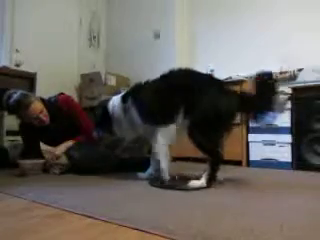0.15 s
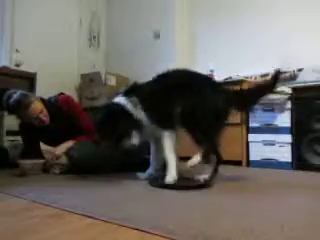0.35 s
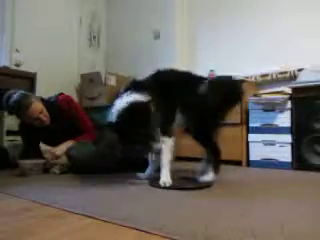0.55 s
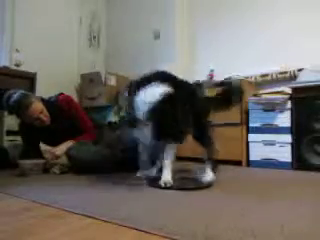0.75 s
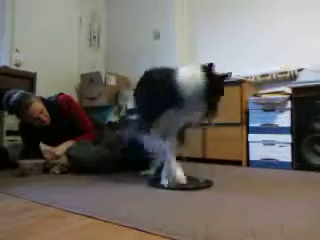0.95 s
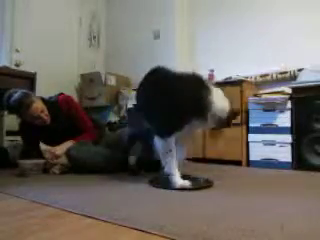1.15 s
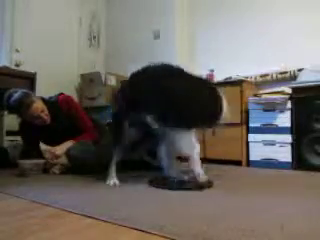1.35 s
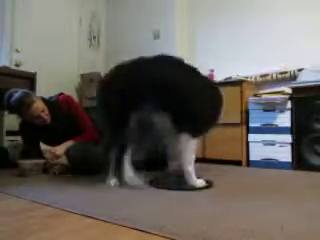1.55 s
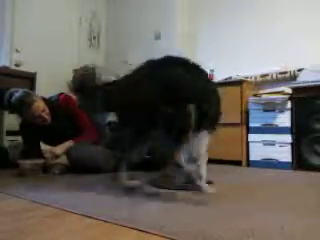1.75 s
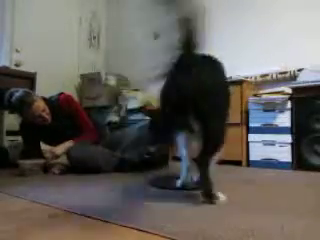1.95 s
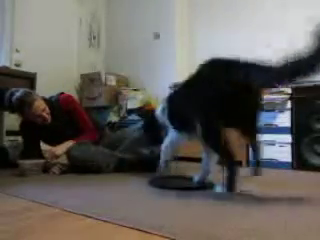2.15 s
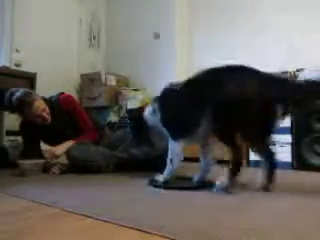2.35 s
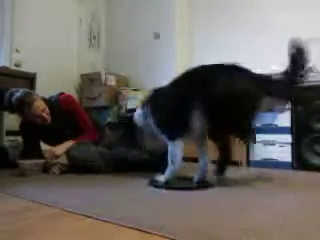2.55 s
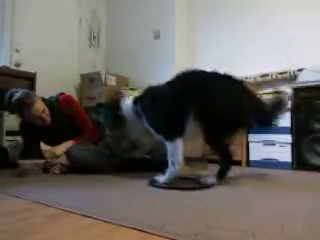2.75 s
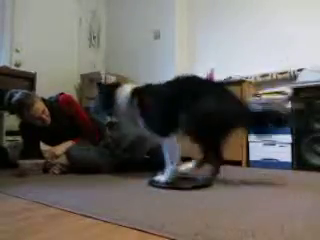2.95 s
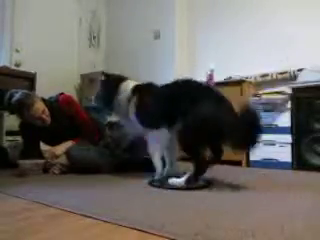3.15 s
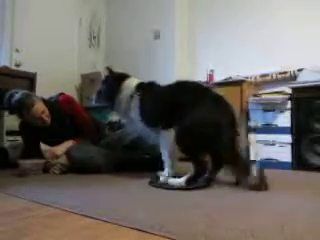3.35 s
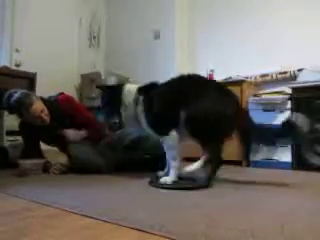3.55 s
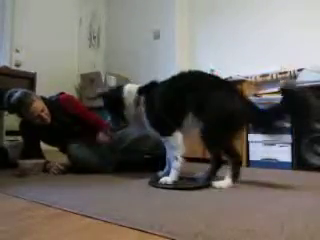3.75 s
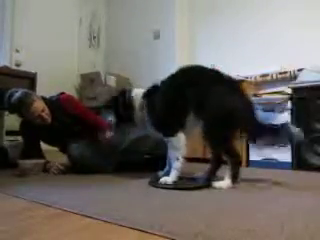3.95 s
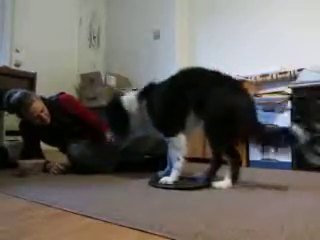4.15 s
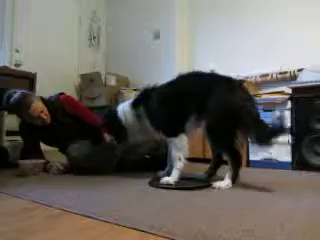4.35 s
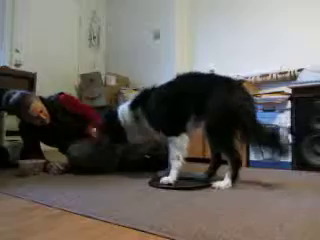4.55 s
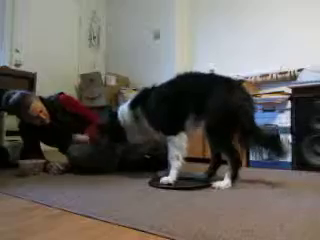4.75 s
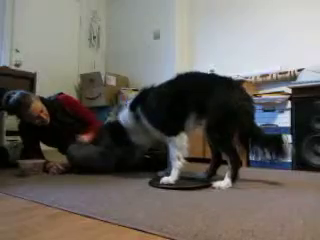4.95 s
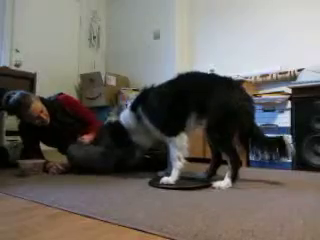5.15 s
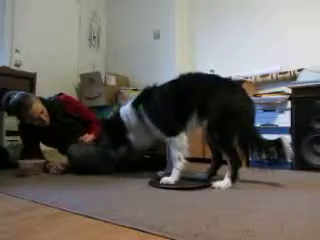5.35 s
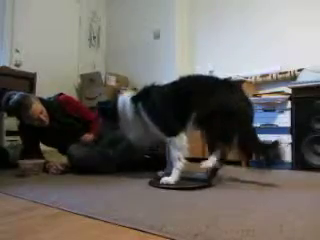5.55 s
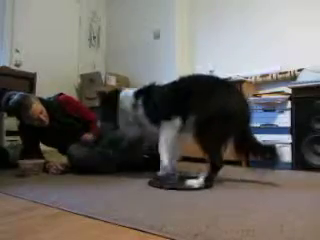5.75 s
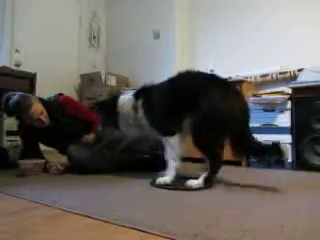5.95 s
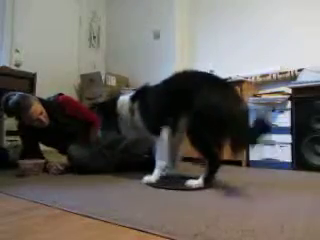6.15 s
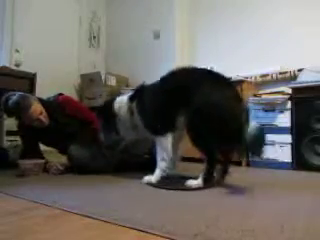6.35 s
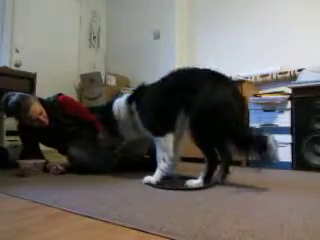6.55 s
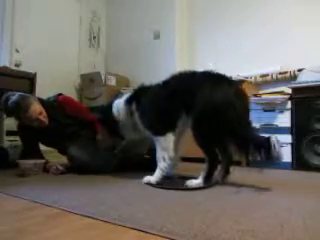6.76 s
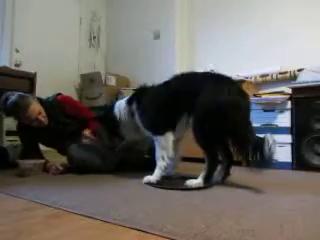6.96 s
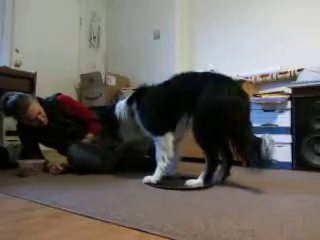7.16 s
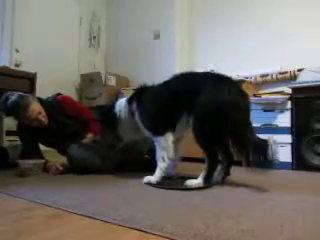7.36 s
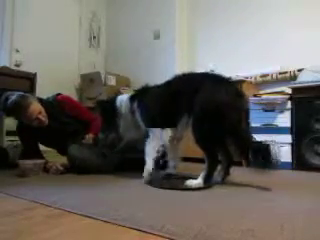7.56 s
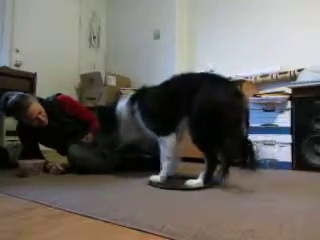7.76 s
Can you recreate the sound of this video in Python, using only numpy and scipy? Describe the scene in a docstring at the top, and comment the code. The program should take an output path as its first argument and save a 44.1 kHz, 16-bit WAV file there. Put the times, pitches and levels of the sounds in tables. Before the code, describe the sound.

Irregular claw clacks and paw thumps on a metal tray, two double clicks from a clicker, and faint rustling in a humming room.

```python
"""A dog's claws tap and skid on a metal tray as it pivots, and its soft paws thud.
The tray lies on the carpet of a small furnished room, so its ringing dies quickly.
A training clicker is pressed and let go twice, its steel leaf snapping each way.
Fur and sleeves rustle between the steps, over a low ventilation hum."""
import sys
import numpy as np
from scipy import signal
from scipy.fft import rfft, irfft
from scipy.io import wavfile
from scipy.ndimage import uniform_filter1d

SR = 44100
rng = np.random.default_rng(int(sys.argv[2]) if len(sys.argv) > 2 else 0)


def to_wav(sig):
    """Store sig (one row per channel, or 1-D mono) as 16-bit WAV at the path in sys.argv[1].

    Samples outside -1..1 are clipped; the rate is SR.
    """
    pcm = np.clip(np.atleast_2d(sig), -1, 1) * 32767
    pcm = np.round(pcm).astype(np.int16)
    wavfile.write(sys.argv[1], SR, pcm.T)  # frames by channels


N = 344862


def undb(db):
    """Turn decibels into a volume multiplier."""
    return 10 ** (np.asarray(db) / 20)

def level(x, db):
    """Set a sound's average (rms) level."""
    return x * undb(db) / np.sqrt(np.mean(x ** 2) + 1e-20)

def unit(x):
    """Scale a sound to a total energy of one."""
    return x / np.sqrt(np.sum(x ** 2) + 1e-20)

def hit_level(x, db):
    """Set a short sound's level, averaged over 50 ms."""
    return unit(x) * undb(db) * np.sqrt(SR / 20)

def clock(seconds):
    """The time of each sample."""
    return np.arange(int(seconds * SR)) / SR

def add(track, start_s, x):
    """Mix a sound into the track."""
    i = max(0, int(start_s * SR))
    track[..., i:i + x.shape[-1]] += x[..., :max(0, N - i)]

def band(x, low_hz, high_hz):
    """Keep the pitches between two limits."""
    return signal.sosfilt(signal.butter(2, [low_hz, high_hz], "band", fs=SR, output="sos"), x)

def along(points, hz):
    """Read between the rows of a (pitch_hz, value) table."""
    pitches, values = np.transpose(points)
    return np.interp(np.log(hz + 1), np.log(pitches), values)

def colour(x, points, size=4096):
    """Shape a sound's tone with a (pitch_hz, gain_db) table."""
    gain = undb(along(points, np.fft.rfftfreq(size, 1 / SR)))
    cepstrum = irfft(np.log(gain))
    cepstrum[1:size // 2] *= 2  # folded so that the filter never rings ahead of a hit
    cepstrum[size // 2 + 1:] = 0
    return signal.fftconvolve(x, irfft(np.exp(rfft(cepstrum))))[:len(x)]

def fade(t, fade_s):
    """Die away by 60 dB in fade_s."""
    return np.exp(-np.log(1000) * t / fade_s)

def wander(per_s):
    """A slow random drift, about 1 in size."""
    hold = int(SR / per_s)
    steps = np.repeat(rng.standard_normal(N // hold + 1), hold)
    return level(uniform_filter1d(steps, hold)[:N], 0)

def ring(tones, t):
    """Struck metal rings with several tones, each fading at its own speed."""
    return unit(sum(undb(db) * fade(t, fade_s) * np.sin(2 * np.pi * (hz * t + rng.random()))
                    for hz, db, fade_s in tones))

def crack(n, spread_s):
    """A sharp hit travels through thin metal: high pitches arrive before low ones."""
    hz = np.fft.rfftfreq(n, 1 / SR)
    delay_s = spread_s / np.sqrt(1 + hz / 1000)
    return irfft(np.exp(-2j * np.pi * np.cumsum(delay_s) * SR / n), n)

def catches(n, per_s, spread_db):
    """Tiny random ticks of uneven size, as when rubbing surfaces stick and slip."""
    ticks = (rng.random(n) < per_s / SR) * rng.choice([-1, 1], n)
    return ticks * undb(spread_db * rng.standard_normal(n))

# How alike the room sounds on the left and right: pitch_hz, likeness (0 to 1)
STEREO_LIKENESS = [(40, 0), (120, 0.76), (300, 0.32), (1200, 0.26), (3000, 0.21), (8000, 0)]
def room_noise(n):
    """Noise from all around at two close microphones: alike in the bass, unrelated in the treble."""
    alike = np.clip(along(STEREO_LIKENESS, np.fft.rfftfreq(n, 1 / SR)), 0, 1)
    mid, side = irfft(rfft(rng.standard_normal((2, n))) * np.sqrt([1 + alike, 1 - alike]), n)
    return np.array([mid + side, mid - side])

def room(x, direct_db, echo_db, hits=(1.0,), size=16384):
    """Play x once per hit, with room echoes that die quickly at first, then linger faintly."""
    t, hits = np.arange(size) / SR, unit(np.asarray(hits))
    decay = fade(t, fade_s=0.2) ** 2 + (undb(-12) * fade(t, fade_s=0.49)) ** 2
    energy = np.abs(signal.fftconvolve(decay, hits ** 2)[:size])
    # every spot in the room has its own pattern of echoes
    response = undb(echo_db) * np.sqrt(2) * unit(room_noise(size) * np.sqrt(energy))
    response[:, :len(hits)] += undb(direct_db) * hits
    return signal.fftconvolve(x[None], response, axes=1)

# Tone of the rushing air: pitch_hz, gain_db
AIR_TONE = [(15, -56), (25, -31.5), (39, -30), (92, -4), (137, -6), (223, -4), (263, -15), (344, -14),
            (439, -22), (476, -19), (796, -23.5), (1330, -26), (4030, -38), (6050, -38.5), (16000, -61.5)]
# Low notes at which the room booms: pitch_hz, width_hz, level_db
ROOM_BOOMS = [(61.3, 17, -61), (172.9, 11.5, -53.5), (227.3, 12, -50.5)]
# Notes of the hum: pitch_hz, relative_level_db
HUM_NOTES = [(107.7, -58.5), (215.3, -55), (236.9, -59.5)]
def ventilation():
    """Air rushes steadily and keeps the room booming, along with a wavering hum."""
    t = np.arange(N) / SR
    rush = level(np.array([colour(side, AIR_TONE) for side in room_noise(N)]), db=-43)
    noise = room_noise(N)
    boom = sum(level(band(noise, hz - width / 2, hz + width / 2), db) for hz, width, db in ROOM_BOOMS)
    hum = sum(undb(db + 2) * np.sqrt(2) * np.sin(2 * np.pi * hz * t + 0.96 * wander(per_s=4.6))
              for hz, db in HUM_NOTES)
    return rush + boom + hum

# Tone of fur and sleeves: pitch_hz, gain_db
RUSTLE_TONE = [(240, -45.5), (400, 7.5), (542, -11.5), (602, 4.5), (723, -0.5), (2960, -4), (4070, -10.5),
               (6130, -7), (15000, -33.5)]
# Brushing strokes: start_s, length_s, level_db
RUSTLE_STROKES = [(2.539, 0.19, -48.5), (2.846, .13, -60.5), (4.193, 0.27, -56), (4.452, 0.21, -49),
                  (4.747, 0.21, -49.5), (6.648, 0.31, -65), (6.9, 0.05, -56), (7.14, 0.16, -60),
                  (7.427, 0.19, -57.5), (7.742, .07, -49.5)]
def rustle(rise_s=0.051, fall_s=0.05):
    """Fur and cloth brush in soft, grainy strokes: each swells, holds and dies away."""
    strokes, t = np.zeros(N), np.arange(N) / SR
    for start_s, length_s, db in RUSTLE_STROKES:
        swell = np.clip((t - start_s) / rise_s, 0, 1)
        tail = np.exp(-np.maximum(t - start_s - length_s, 0) / fall_s)
        strokes += undb(db) * swell * tail
    flicker = undb(0.5 * wander(per_s=27))
    grain = colour(catches(N, per_s=4000, spread_db=10.56), RUSTLE_TONE)
    return strokes * flicker * level(grain, 0)

# Clicker pressed, and let go: start_s, level_db
CLICKER_PRESSES = [(3.415, -25), (6.031, -25)]
CLICKER_RELEASES = [(3.5402, -25.5), (6.1426, -24)]
# Ringing of its steel leaf in each position: pitch_hz, level_db, fade_s
PRESSED_RING = [(2630, -24, 0.034), (3180, -15, 0.0035), (4930, -17, 0.024), (5600, -1, 0.0036),
                (6750, -11, 0.029), (7000, -2.5, 0.0045)]
RELEASED_RING = [(2670, 12, 0.0027), (3400, -34, 0.02), (4175, 13.5, 0.013), (4320, -19.5, 0.028),
                 (4510, 13, 0.0051), (5900, -22.5, 0.017), (8560, -12, 0.017)]
# Tone of the snap: pitch_hz, gain_db
SNAP_TONE = [(410, -55), (700, -16), (1180, -16), (1840, -9.5), (2400, -1.5), (3030, -3), (4260, -3.5),
             (5260, 2), (6920, -0.5), (16000, -27)]
# A hand shields the clicker, so echoes off floor, walls and ceiling carry it: delay_s, gain_db
SNAP_PATHS = [(0, 7), (.0018, 11), (.0081, 12), (.0097, 9), (.0205, 2), (0.031, -2)]
def clicker():
    """A steel leaf buckles with a snap and springs back about an eighth of a second later."""
    out, t = np.zeros((2, N)), clock(.06)
    snap = unit(colour(crack(len(t), spread_s=.001), SNAP_TONE))
    paths = np.zeros(len(t))
    for delay_s, db in SNAP_PATHS:
        paths[int(delay_s * SR)] = undb(db)
    for clicks, tones in ((CLICKER_PRESSES, PRESSED_RING), (CLICKER_RELEASES, RELEASED_RING)):
        for start_s, db in clicks:
            click = hit_level(band(ring(tones, t), 1930, 14000) + undb(-2) * snap, db)
            add(out, start_s, room(click, direct_db=-1.5, echo_db=-1, hits=paths))
    return out

# Tone of the scuffs and hisses: pitch_hz, gain_db
SWELL_TONE = [(290, -48), (500, -30), (570, -18), (1090, -27), (1570, -9.5), (2930, -6.5), (3440, -7.5),
              (8830, -12.5), (14500, -33), (16000, -25)]
# Scuffs, paw drags and, at 0.827 and 1.065 s, faint hisses: loudest_at_s, rise_s, fall_s, level_db
SWELLS = [(0.322, 0.081, 0.042, -44), (0.827, 0.011, 0.004, -39), (1.065, 0.025, 0.0059, -40.5),
          (1.765, .02, .008, -57.5), (1.985, .015, 0.011, -45), (5.746, 0.028, 0.014, -22)]
def scuffs_and_hisses():
    """Tiny ticks swell and fade: a paw scuffing the tray, or a faint hiss just before a tap."""
    out, t = np.zeros(N), np.arange(N) / SR
    grain = level(colour(catches(N, per_s=5000, spread_db=8.9), SWELL_TONE), 0)
    for loudest_at_s, rise_s, fall_s, db in SWELLS:
        width_s = np.where(t < loudest_at_s, rise_s, fall_s)
        out += grain * undb(db) / np.cosh((t - loudest_at_s) / width_s) ** 2.3
    return out

# Soft paw pads landing: start_s, relative_level_db, pitch_hz
PAW_LANDINGS = [(0.036, -16.5, 613), (0.472, -19, 276), (0.586, -16, 298), (1.054, -20, 370),
                (1.28, -19.5, 336), (1.393, -29.5, 593), (1.663, -29.5, 217), (2.012, -17, 378),
                (2.19, -27, 220), (2.302, -18.5, 373), (2.664, -22, 294), (2.902, -28.5, 325),
                (3.145, -22.5, 217), (3.153, -26, 660), (3.347, -26.5, 320), (3.782, -18.5, 276),
                (5.679, -30, 372), (5.785, -21, 215), (6.228, -24.5, 234), (6.248, -22.5, 218),
                (6.359, -29, 345), (6.383, -26.5, 330)]
def paw_thuds():
    """A soft pad pushes the tray into the carpet: a dull knock with a little patter above it."""
    out, t = np.zeros((2, N)), clock(.12)
    for start_s, db, hz in PAW_LANDINGS:
        knock = unit(np.sin(2 * np.pi * hz * t) * fade(t, 0.032) * (1 - np.exp(-t / 0.0015)))
        puff = rng.standard_normal(len(t)) * fade(t, 0.089) * (1 - np.exp(-t / 0.00075))
        patter = unit(band(puff, 0.91 * hz, 3 * hz))
        thud = hit_level(knock + undb(-4.5) * patter, db - 13)
        add(out, start_s, room(thud, direct_db=-3, echo_db=-2.5))
    return out

def touch(x, weight_db, sharp_db, spot_hz):
    """A heavy hit adds bass, a sharp one adds treble, and the spot it lands on favours one pitch."""
    bass_below_hz, treble_above_hz = 810, 5060
    spot_db, spot_octaves = 4.5, 0.2
    hz = np.geomspace(50, SR / 2, 120)
    bass = weight_db / (1 + (hz / bass_below_hz) ** 2)
    treble = sharp_db / (1 + (treble_above_hz / hz) ** 2)
    spot = spot_db * np.exp(-(np.log2(hz / spot_hz) / spot_octaves) ** 2)
    return colour(x, np.transpose([hz, bass + treble + spot]))

# Tone of the tray's short clack: pitch_hz, gain_db
CLACK_TONE = [(140, -27.5), (230, -2), (378, 0), (452, -9.5), (783, -4.5), (1060, -4.5), (2230, -1),
              (2530, -3.5), (2910, -1), (4010, -7.5), (5420, -6), (6700, -8.5), (12300, -24),
              (14100, -25.5), (16000, -31)]
# Ringing of the tray: pitch_hz, level_db, fade_s
TRAY_RING = [(393.4, -9.5, 0.33), (582, 7, 0.1), (900, -2, 0.24), (1590, -6, 0.23), (2173, 4, 0.21),
             (2140, 5.5, 0.072), (2290, 15, 0.049), (2710, 0, 0.041), (2910, 1, 0.22), (2718, 7, 0.047),
             (3531, -2, 0.2), (4420, -8.5, 0.3), (4570, 15, 0.028), (4900, -11, 0.34), (5380, -3, 0.21),
             (5900, -2, 0.034), (6540, -14, 0.04), (6737, -18, 0.073), (6640, -16, 0.033),
             (7590, -14, 0.033)]
# Taps on the tray: start_s, skid_s, relative_level_db, weight_db, sharp_db, spot_hz
# They are claws, except at 4.574 s: a faint tick amid the rustle, perhaps a treat crumb.
TRAY_TAPS = [(.0045, 0.013, -28, 7, -2, 796), (0.0309, 0.0036, -17.5, 4.5, -2.5, 847),
             (.22, 0.012, -41.5, -1, 1, 2200), (0.4399, 0.02, -22.5, -5, 7.5, 2970),
             (0.459, 0.0057, -20.5, -1.5, -20, 1890), (0.5844, 0.016, -31, 2, 5.5, 854),
             (0.608, 0.0073, -31.5, -20, 5, 2150), (.6316, 0, -30.5, -5.5, 2.5, 2900),
             (.8324, 0, -28, -1.5, 2.5, 1540), (0.841, .003, -33, -11, -12, 2900),
             (1.068, 0.018, -19, -3, 5.5, 1380), (1.2656, 0.0052, -22, 6.5, 5, 2500),
             (1.452, 0.022, -23, -4.5, -4.5, 2880), (1.635, 0.04, -43.5, 12, 5.5, 2200),
             (1.771, 0.0022, -17, 7, -3, 1790), (2.006, 0.0051, -24, 5.5, 6.5, 1930),
             (2.3165, 0.0051, -20, -21, -1, 2870), (2.3313, 0, -26.5, -15, 5.5, 5600),
             (2.66, 0.03, -39.5, 3, -6, 1350), (2.789, 0.031, -46, -12, -14, 2900),
             (2.864, 0.013, -52, 8, -2, 2200), (3.001, 0.018, -46, -3, 4, 2960),
             (3.0345, 0.0034, -44, 9.5, 6.5, 5560), (3.147, 0.021, -39.5, 14, -10, 806),
             (3.206, 0.029, -48.5, -4, 7, 2900), (3.233, 0.015, -43, -10, 1, 2900),
             (3.4422, 0.0051, -26, -1, 5, 1420), (3.462, 0.016, -22.5, -6.5, -15, 2770),
             (3.7622, 0.012, -23, -5, -9.5, 605), (4.574, 0.0072, -49.5, -11, 1, 5450),
             (5.271, 0.0023, -71, -4, 25, 5530), (5.92, 0.0072, -21.5, -3.5, 0, 2800),
             (5.936, 0, -23, -1, -7, 1430), (6.073, 0.042, -35, 4, 3, 1400),
             (6.359, 0.0084, -32.5, -26, 5, 2900), (6.3856, 0.0034, -29, -30, -4, 2200),
             (7.501, 0.00026, -44.5, -4, -17, 2100), (7.565, .013, -53, 13, -6, 2090),
             (7.783, 0.021, -49, 16, -16, 2100)]
def tray_taps(chatter_strength=0.19, glancing_skid_s=0.026):
    """Each tap makes the tray clack and ring, and a skidding claw chatters on it."""
    out, t = np.zeros((2, N)), clock(.14)
    clack = unit(colour(crack(len(t), spread_s=.0018), CLACK_TONE))
    for start_s, skid_s, db, weight_db, sharp_db, spot_hz in TRAY_TAPS:
        skid = np.exp(-(t / (skid_s + 1e-4)) ** 2)
        hits = chatter_strength * catches(len(t), per_s=2000, spread_db=1.7) * skid
        hits[0] = 1 / (1 + skid_s / glancing_skid_s)  # a longer skid softens the first hit
        strike = hit_level(clack + undb(-9.5) * ring(TRAY_RING, t), db)
        tap = touch(strike, weight_db, sharp_db, spot_hz)
        add(out, start_s, room(tap, direct_db=-6.5, echo_db=-1.5, hits=hits))
    return out

def scene():
    """The dog and the clicker, a touch to the right, over the ventilation."""
    brushing = room(scuffs_and_hisses() + rustle(), direct_db=-6, echo_db=2)[:, :N]
    balance = undb([[-.4], [.4]])
    return (tray_taps() + paw_thuds() + clicker() + brushing) * balance + ventilation()

def record(dry, ceiling=.65, top_hz=15900):
    """Round off the sharpest peaks and cut the highest treble."""
    rounded = ceiling * np.tanh(dry / ceiling)
    return signal.sosfilt(signal.ellip(10, .2, 75, top_hz, fs=SR, output="sos"), rounded)


dry = scene()
out = record(dry)
to_wav(out)
```